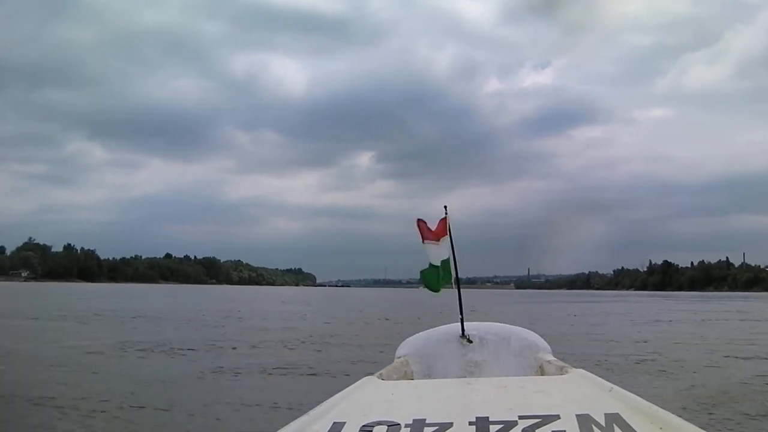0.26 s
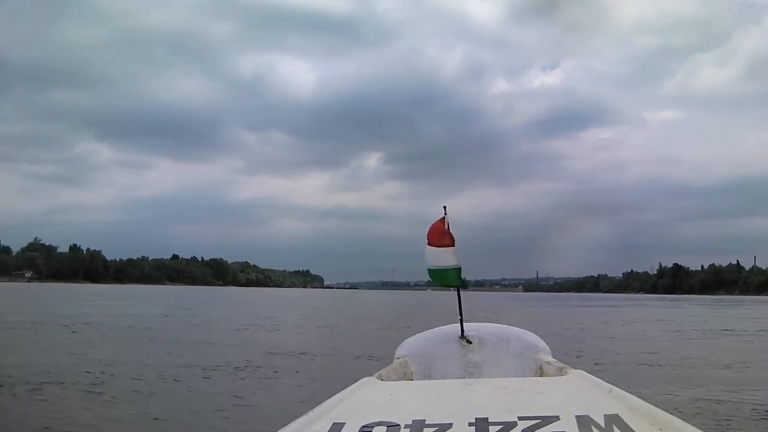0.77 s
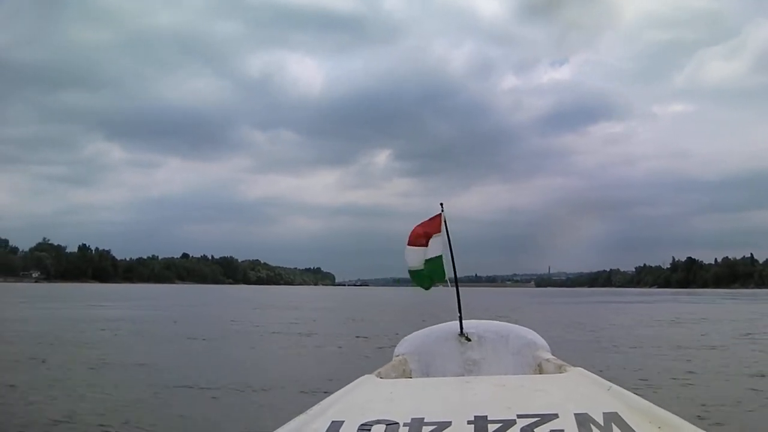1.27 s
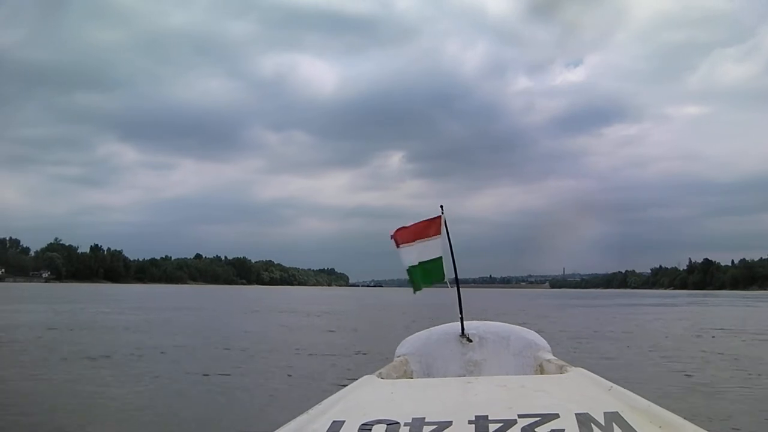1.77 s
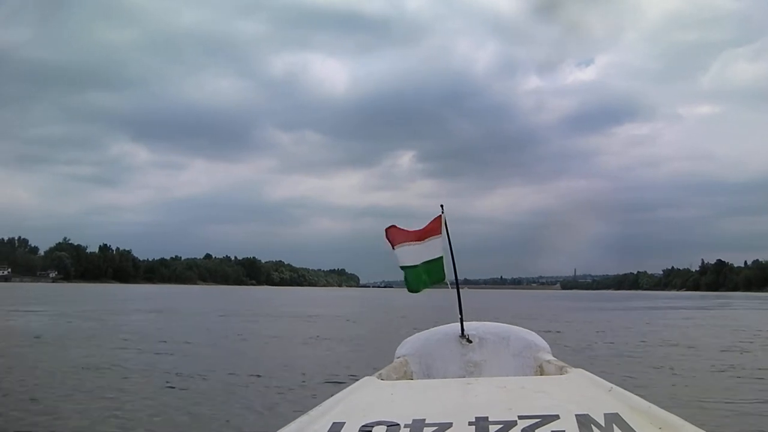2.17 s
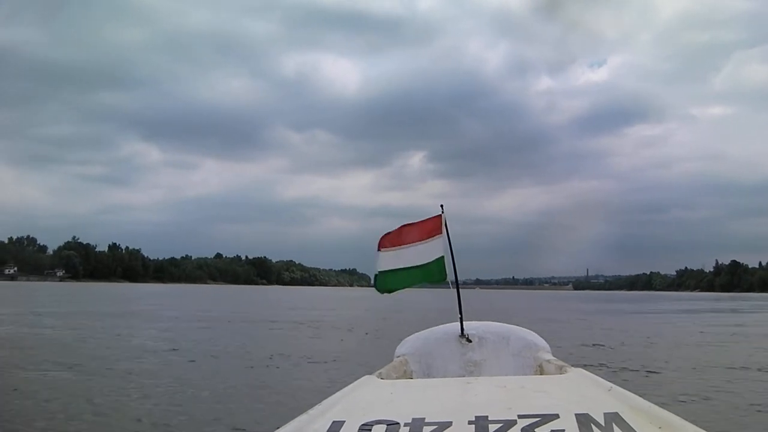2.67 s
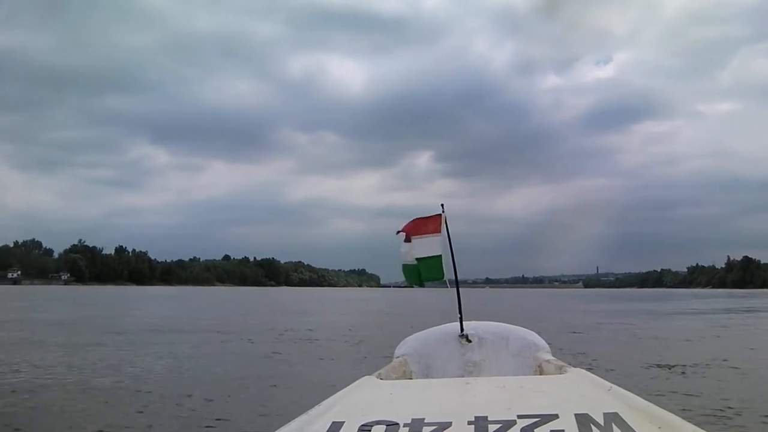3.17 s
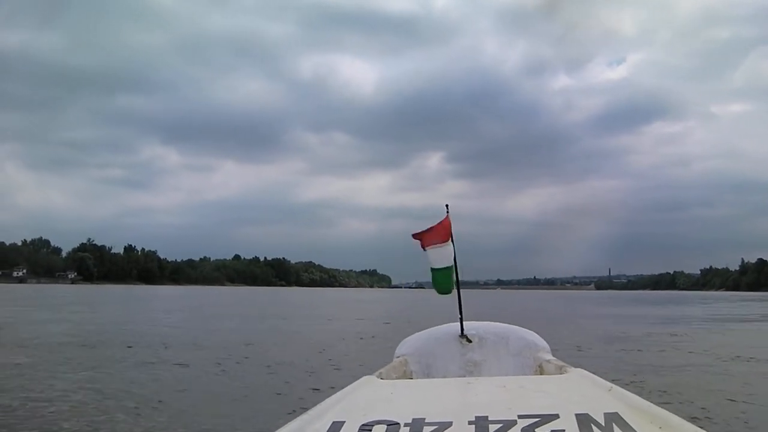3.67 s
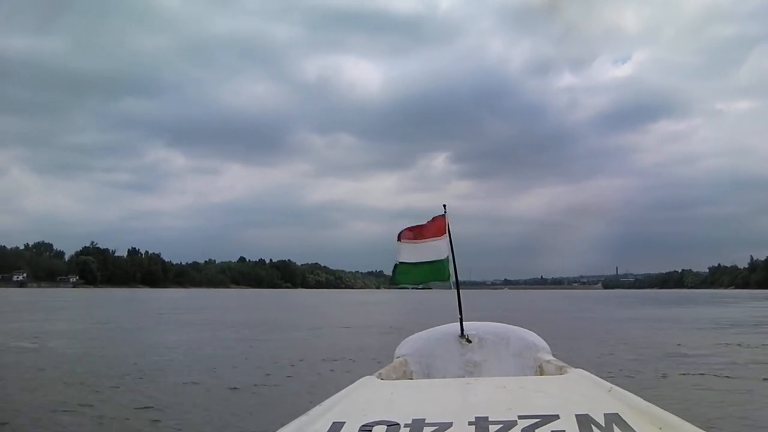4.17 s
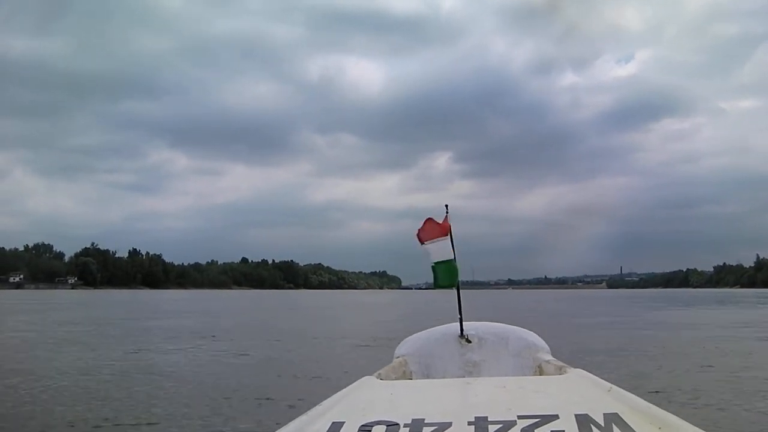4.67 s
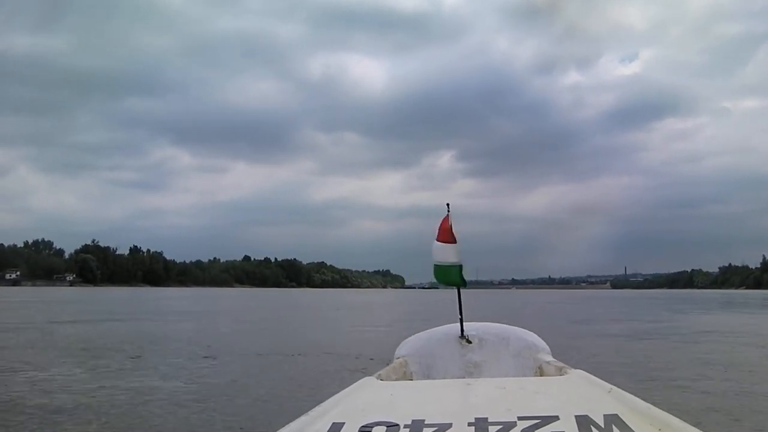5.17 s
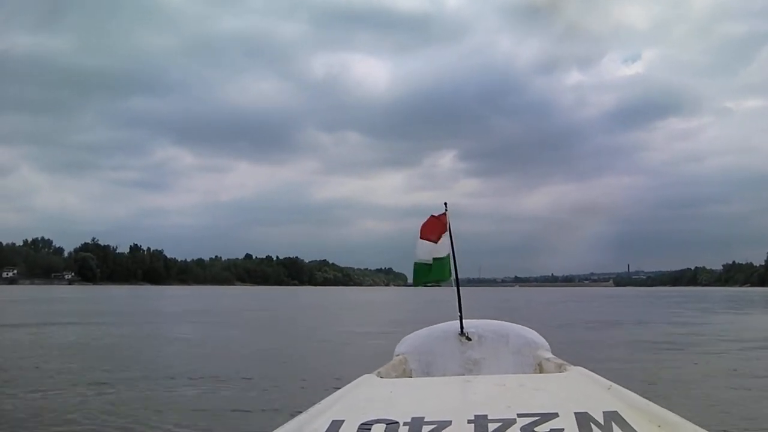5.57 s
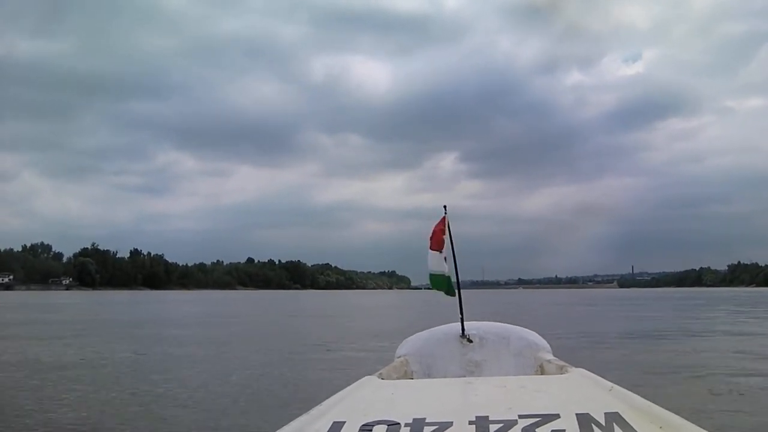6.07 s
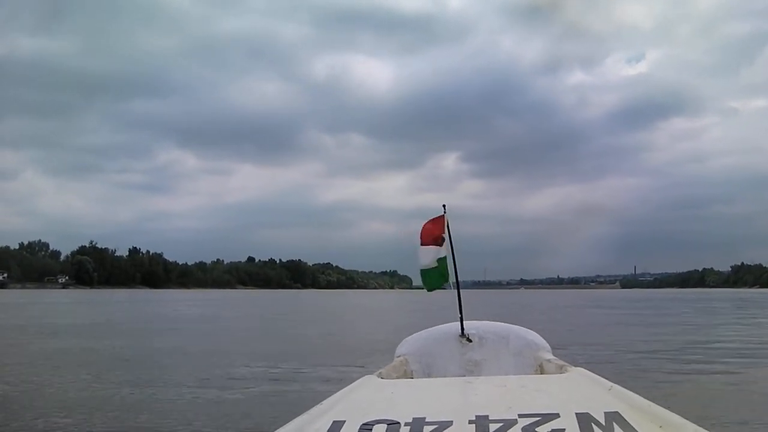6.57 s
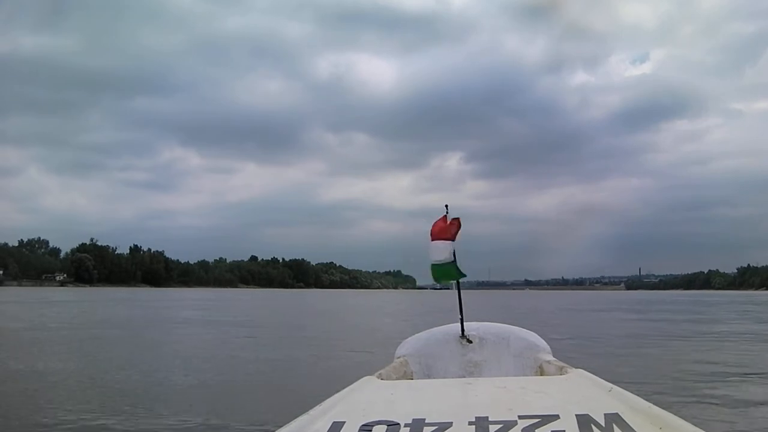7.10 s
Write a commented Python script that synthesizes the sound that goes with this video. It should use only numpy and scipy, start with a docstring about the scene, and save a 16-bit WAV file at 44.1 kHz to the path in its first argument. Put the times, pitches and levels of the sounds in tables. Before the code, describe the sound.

Strong headwind thuds, flutters and crackles over the microphone while a small outboard motor drones steadily, calming midway before the gusts return.

```python
"""Outboard motor in a headwind

A small two-stroke outboard at a steady firing rate: sine orders over an exhaust roar of coloured noise.
Headwind buffets the microphone ports: noise rumble and flutter, slow thumps, ringing thuds when an eddy
breaks, and clicking snaps when the capsule is overdriven. The wake hisses faintly as high noise.
The recorder lowers its gain after loud moments and rounds the highest peaks."""
import sys
import numpy as np
from scipy import signal
from scipy.fft import rfft, irfft, next_fast_len
from scipy.io import wavfile
from scipy.ndimage import uniform_filter1d

SR = 44100
rng = np.random.default_rng(int(sys.argv[2]) if len(sys.argv) > 2 else 0)


def wav_out(sig):
    """Save sig, one row per channel (or a flat mono array), as 16-bit PCM at SR to the path in sys.argv[1]."""
    wavfile.write(sys.argv[1], SR, np.round(np.clip(np.atleast_2d(sig).T, -1, 1) * 32767).astype(np.int16))


N = 323694

# motor loudness: time_s, level_db
MOTOR_LEVEL = [(0, -26), (1, -27.5), (2, -32), (3, -32.5), (4, -35), (5, -33.5), (6, -31.5), (7.34, -30.5)]
# orders of the firing rate: multiple, relative_level_db
FIRING_ORDERS = [(1, -6.5), (2, -14), (3, -18), (4, -18), (5, -16), (6, -11), (7, -12), (9, -14), (10, 0),
                 (11, -11), (12, -26), (15, -28), (16, -34), (21, -35), (22, -27.5)]
# exhaust roar spectrum: frequency_hz, relative_gain_db
ROAR_SPECTRUM = [(40, -40), (90, -8), (220, -14.5), (400, -7.5), (510, -6), (580, 1), (650, -3), (740, -5),
                 (820, -14), (1000, -24), (1450, -25.5), (1750, -41), (2050, -44.5), (2300, -54),
                 (3500, -75)]
FIRING_HZ = 69.42


def motor(roar_db, gate, waver_db, slip_rad):
    """Firing-rate orders, each slipping in phase, over an exhaust roar that swells once per firing."""
    level_db, = in_time(MOTOR_LEVEL)
    firing_hz = FIRING_HZ * (1 + .002 * drift(1.5) + .002 * drift(8))
    turn_rad = 2 * np.pi * np.cumsum(firing_hz) / SR
    starts_rad = rng.uniform(0, 2 * np.pi, len(FIRING_ORDERS))
    tones = np.zeros(N)
    for (multiple, db), start_rad in zip(FIRING_ORDERS, starts_rad):
        order_db = db + waver_db * (1.1 * drift(1.9) + drift(11.0))
        phase_rad = multiple * turn_rad + start_rad + slip_rad * drift(12.0)
        tones += from_db(order_db) * np.sin(phase_rad)
    swell = (1 + gate * np.cos(turn_rad)) * from_db(1.6 * drift(29.0))
    roar = noise(ROAR_SPECTRUM, swell)
    return from_db(level_db) * (np.sqrt(2) * tones + from_db(roar_db) * roar)


# headwind under the buffets: time_s, rumble_level_db
WIND_LEVEL = [(0.0, -15.5), (0.33, -35.5), (0.63, -18), (1.02, -24.5), (1.33, -19.5), (1.68, -25.5),
              (2.0, -18), (2.33, -29), (3.0, -26), (3.45, -29.5), (3.7, -28.5), (3.9, -37.5), (4.99, -37),
              (5.52, -41.5), (6.81, -23.5), (6.91, -28), (7.24, -23), (7.34, -28)]
# buffets: start_s, length_s, swell_db, flutter_re_swell_db
WIND_BUFFETS = [(0.004, 0.0023, 2, -11), (0.069, 0.017, -18.5, -3), (0.095, 0.024, -20.5, -12.5),
                (0.171, 0.023, -16, -1), (0.28, 0.066, -20.5, 6.5), (0.455, 0.018, -10, 0),
                (0.491, 0.061, -15, -3), (0.58, 0.013, -23.5, 5), (0.751, 0.033, -21.5, -9.5),
                (0.815, 0.037, -13.5, 3), (0.963, 0.032, -19, 1), (1.071, 0.015, -6, -18.5),
                (1.187, 0.054, -18, 0), (1.23, 0.031, -13.5, -2.5), (1.306, 0.024, -19.5, -4),
                (1.366, 0.065, -12, 0), (1.466, 0.014, -20, -8), (1.519, 0.028, -9.5, 3),
                (1.655, 0.056, -24, -3), (1.78, 0.045, -16.5, -0.5), (1.837, 0.11, -18.5, -1.5),
                (1.957, 0.035, -21, 5), (2.042, 0.039, -12.5, 6.5), (2.103, 0.1, -23.5, 7.5),
                (2.207, 0.047, -19, 0), (2.359, 0.038, -24.5, -3), (2.437, 0.066, -26, -0.5),
                (2.548, 0.024, -19, -3), (2.636, 0.076, -16, -3), (2.753, 0.039, -18.5, 0.5),
                (2.977, 0.039, -21, 2.5), (3.057, 0.027, -26, 3.5), (3.16, 0.099, -26.5, 10.5),
                (3.298, 0.049, -38, 5.5), (3.361, 0.12, -32, 6), (3.472, 0.028, -28, 12),
                (3.602, 0.05, -23.5, 2), (3.707, 0.041, -25, 7), (3.918, 0.013, -25, -8),
                (4.001, 0.016, -26.5, 2), (4.21, 0.097, -32.5, -16), (4.612, 0.022, -20, -10),
                (4.675, 0.02, -27, -8), (4.712, 0.022, -29, -11), (4.779, 0.031, -20.5, -9),
                (4.866, 0.022, -27.5, -15), (4.918, 0.021, -29, -14), (5.006, 0.044, -29.5, -6),
                (5.128, 0.054, -22, -7), (5.819, 0.026, -27, -1.5), (5.96, 0.031, -21, -9),
                (6.075, 0.024, -25, -10), (6.22, 0.091, -22, 3), (6.351, 0.077, -28, -3.5),
                (6.42, 0.022, -16, 0), (6.542, 0.076, -26.5, 4), (6.644, 0.028, -17, -1.5),
                (6.691, 0.077, -23, 0), (6.786, 0.024, -16, 4.5), (6.853, 0.089, -17.5, 2),
                (6.962, 0.039, -21, 5), (7.08, 0.069, -22, -1), (7.157, 0.045, -14.5, -1),
                (7.258, 0.023, -18, -1)]
BUFFET_EDGE_S = 0.011   # rise and fall
FLUTTER_UNDER_DB = -1.5   # flutter re rumble, between buffets
THUMP_LOW_HZ, THUMP_HIGH_HZ = 88.25, 135.1
THUMP_DB, BUFFET_RUMBLE_DB = -7, -3.5   # both re swell_db


def headwind():
    """Rumble and flutter curves in dB, plus thumps: each buffet swings the diaphragm slowly."""
    wind_db, = in_time(WIND_LEVEL)
    rumble = from_db(wind_db)
    flutter = from_db(wind_db + FLUTTER_UNDER_DB)
    thumps = np.zeros(N)
    chances = rng.uniform(0, 1, (len(WIND_BUFFETS), 2))
    for (start_s, length_s, db, flutter_db), (pitch, phase) in zip(WIND_BUFFETS, chances):
        first_s = max(start_s - BUFFET_EDGE_S, 0)
        t = first_s + np.arange(round((length_s + 2 * BUFFET_EDGE_S) * SR)) / SR
        nearest_edge_s = np.minimum(t - start_s, start_s + length_s - t)
        shape = from_db(db) * np.clip(nearest_edge_s / BUFFET_EDGE_S + .5, 0, 1)
        hz = THUMP_LOW_HZ + pitch * (THUMP_HIGH_HZ - THUMP_LOW_HZ)
        add(rumble, first_s, from_db(BUFFET_RUMBLE_DB) * shape)
        add(flutter, first_s, from_db(flutter_db) * shape)
        add(thumps, first_s, np.sqrt(2) * shape * np.sin(2 * np.pi * (hz * t + phase)))
    return 20 * np.log10(rumble), 20 * np.log10(flutter), from_db(THUMP_DB) * thumps


# rumble spectrum: frequency_hz, relative_gain_db
RUMBLE_SPECTRUM = [(15, -30), (25, -18), (60, -4.5), (103, 1), (125, 0.5), (263, -17), (306, -37),
                   (356, -7), (400, -9), (520, -31.5), (880, -120)]
# flutter spectrum: frequency_hz, relative_gain_db
FLUTTER_SPECTRUM = [(130, -37), (220, -8.5), (289, -8.5), (402, 12), (678, 2), (943, -6), (1120, -19.5),
                    (1400, -18), (1780, -28), (3330, -53.5), (4330, -61), (7330, -120)]


def wind(rumble_db, flutter_db, lumpy_db, grains_per_s, grain_db):
    """Pressure lumps shared by rumble and crackling flutter: small eddies tap the port cavity."""
    eddies = drift(31.0)
    rumble = noise(RUMBLE_SPECTRUM, from_db(lumpy_db * eddies))
    hits = rng.random(N) < grains_per_s / SR
    taps = hits * from_db(grain_db * np.minimum(rng.exponential(1, N), 2.0))
    taps = uniform_filter1d(taps, size=40)   # each tap lasts about 1 ms
    lumps = from_db(lumpy_db * 1.48 * eddies) * (0.52 + rms_one(taps))
    flutter = noise(FLUTTER_SPECTRUM, lumps)
    return from_db(rumble_db) * rumble + from_db(flutter_db) * flutter


# strong eddies breaking on the ports: middle_s, ring_db, sink_db
STRONG_THUDS = [(0.081, -11.5, -11), (0.1041, -2.5, -4), (0.1847, -3, -18), (0.238, -9, -21.5),
                (0.2493, -8.5, -30), (0.2889, -10, -7), (0.3049, -3, -25), (0.3184, -23, -23.5),
                (0.3285, -10.5, -25.5), (0.352, -7.5, -9.5), (0.4624, 0, -13), (0.486, -9, -25.5),
                (0.4968, -2.5, -34), (0.5151, -5, -18), (0.5292, -10, -18.5), (0.5898, 1, -7),
                (0.6135, -5.5, -26), (0.645, -12.5, -24.5), (0.717, -12, -24), (0.7297, -16, -32),
                (0.7671, -7, -19), (0.7806, -4, -11), (0.793, -9.5, -34), (0.8258, -1.5, -6),
                (0.957, -11, -32), (0.9712, -6, -22), (0.9898, -19, -15), (1.032, -10, -27),
                (1.08, -0.5, -18), (1.103, -13, -23), (1.1166, -3.5, -8), (1.127, -3, -25),
                (1.172, -9, -28.5), (1.2017, -6.5, -7), (1.244, -9.5, -9), (1.266, -8, -22.5),
                (1.3552, -5, -19), (1.3672, -5.5, -22), (1.3983, -2, -12), (1.4193, -10, -24),
                (1.4768, -6.5, -9.5), (1.5242, -0.5, -15), (1.533, -4, -13.5), (1.5417, -12, -7),
                (1.7882, -14, -12.5), (1.806, -8, -11), (1.8642, -5.5, -24), (1.9058, -5, -29),
                (1.965, -7.5, -14), (1.972, -3.5, -13), (2.041, -5.5, -33), (2.0554, 0, -14),
                (2.0636, -1, -21), (2.0768, 4.5, -23), (2.1168, -6.5, -2.5), (2.1643, -11, -25),
                (2.2308, -4.5, -23), (2.3645, -18, -22), (2.3777, -9.5, -20), (2.473, -6.5, -16),
                (2.487, -9.5, -13), (2.5176, -10, -33), (2.6674, -6, -19), (2.7155, -7.5, -21),
                (2.7881, -13, -18), (2.824, -13, -23), (2.9396, -11, -30), (2.9848, -5, -16.5),
                (2.9984, -7, -26), (3.1375, -8.5, -16.5), (3.1628, -8, -21), (3.1878, -6, -9.5),
                (3.1934, -11.5, -25), (3.3112, -6.5, -20), (3.377, -6.5, -30), (3.4171, -6, -13),
                (3.488, -2.5, -34), (3.4965, -5.5, -32), (3.6101, -10, -14), (3.717, -11.5, -35),
                (3.7588, -11, -18), (4.0113, -10, -18), (4.9311, -12, -22), (5.035, -15, -23),
                (6.071, -22, -26), (6.2771, -8, -24), (6.431, -15, -13), (6.5676, -8.5, -30),
                (6.5868, -5, -15.5), (6.661, -6.5, -12), (6.7066, -12, -24), (6.743, -2, -15.5),
                (6.752, -11, -11), (6.7952, -9.5, -4), (6.824, -10.5, -9.5), (6.8814, -17, -17.5),
                (6.8953, -8, -25), (6.9891, -10.5, -33), (7.0692, -18, -26), (7.0836, -11.5, -20),
                (7.0942, -18, -24.5), (7.1011, -10, -21), (7.1248, -7, -40), (7.139, -7.5, -22),
                (7.1707, -16.5, -17), (7.2353, -6.5, -15), (7.253, -9, -28.5), (7.2688, -9.5, -11)]
SMALL_THUDS_PER_S, FULL_WIND_DB = 20, -19   # rate at full wind; flutter level that counts as full
SMALL_THUD_DB, SMALL_SINK_DB = 4, -10   # ring re wind; sink re ring


def eddies_breaking(flutter_db):
    """Time, ring dB and sink dB of all thuds: strong ones, then random small ones, denser in strong wind."""
    odds = SMALL_THUDS_PER_S / SR * np.minimum(from_db(flutter_db - FULL_WIND_DB), 1) ** 2
    small = np.flatnonzero(rng.random(N) < odds)
    small = small[small > 700]   # room for the burst's first half
    small_db = np.minimum(flutter_db[small], FULL_WIND_DB) + SMALL_THUD_DB
    return np.c_[np.transpose(STRONG_THUDS), [small / SR, small_db, small_db + SMALL_SINK_DB]]


THUD_LOW_HZ, THUD_HIGH_HZ = 440, 620   # cavity ring
THUD_WIDTH_S, THUD_WIDER_S = 0.0018, 0.00041   # about the least width at half height; scale of the extra
SINK_AFTER_S, SINK_HZ, SINK_WIDTH_S = 0.0026, 127, 0.0068


def thuds(times_s, db, sink_db, under_db, spray_db, apart_db):
    """Each eddy briefly rings the port cavity, unevenly left and right, with a puff of brighter
    turbulence; then the diaphragm sinks once and swings back."""
    start, ratio, lean, pitch, long = rng.uniform(0, 1, (len(times_s), 5)).T
    hz = THUD_LOW_HZ + pitch * (THUD_HIGH_HZ - THUD_LOW_HZ)
    width_s = THUD_WIDTH_S - THUD_WIDER_S * np.log(long + 0.054)

    def swing(k, t):
        turn_rad = 2 * np.pi * (hz[k] * t + start[k])
        undertone = np.sin(turn_rad * (0.2 + 0.72 * ratio[k]))
        return from_db(db[k]) * (np.sin(turn_rad) + from_db(under_db) * undertone)

    def sag(k, t):
        return -from_db(sink_db[k]) * np.cos(2 * np.pi * SINK_HZ * t)

    cavity = bursts(times_s, width_s, swing)
    side = bursts(times_s, width_s, lambda k, t: (2 * lean[k] - 1) * swing(k, t - .0004))
    puffs = bursts(times_s, width_s * 1.4, lambda k, t: from_db(db[k] + spray_db))
    puff_spectrum = [(500, -30.5), (900, 15.5), (1800, -10.5), (3500, -35.0), (6000, -66.5)]   # Hz, dB
    spray = puffs * noise(puff_spectrum, 1)
    sink = bursts(times_s + SINK_AFTER_S, times_s * 0 + SINK_WIDTH_S, sag)
    return cavity + sink + from_db(apart_db) * side * [[1], [-1]] + spray


# strong capsule snaps, before the mix gains and tip filter: time_s, body_db, treble_db
STRONG_SNAPS = [(0.0783, -32, -70.5), (0.184, -38.5, -68.5), (0.2894, -33, -74), (0.305, -37, -76),
                (0.463, -26, -51.5), (0.484, -20.5, -49), (0.5124, -33, -67), (0.589, -16, -50),
                (0.7595, -35, -74), (0.8254, -36.5, -84), (0.969, -20.5, -46), (0.974, -25.5, -66),
                (1.0143, -34, -61), (1.032, -35, -63), (1.0768, -16.5, -80), (1.0788, -12.5, -46),
                (1.1012, -39, -73), (1.117, -28, -70), (1.1244, -25.5, -68), (1.128, -32, -71),
                (1.132, -38.5, -75), (1.198, -36, -78), (1.2249, -32, -83.5), (1.2316, -43, -86),
                (1.2466, -38.5, -79.5), (1.3449, -39, -77), (1.3949, -35.5, -68), (1.398, -32, -77),
                (1.415, -41.5, -55), (1.521, -28, -57), (1.524, -11, -46), (1.5283, -21, -60),
                (1.5319, -34, -66), (1.5398, -16.5, -43.5), (1.804, -31.5, -76), (1.853, -34, -74),
                (1.8634, -36, -74), (1.8977, -44, -84), (1.9645, -35, -65), (1.9694, -21, -49),
                (1.9744, -37, -67), (1.9805, -33, -70), (2.0474, -24, -60), (2.054, -15, -45),
                (2.0612, -32, -55), (2.0763, -12, -32), (2.084, -45, -55), (2.09, -45, -51),
                (2.115, -40.5, -56.5), (2.118, -26, -52), (2.1488, -37, -54.5), (2.1994, -31, -76),
                (2.216, -25, -90), (2.227, -29.5, -86), (2.2441, -42, -75), (2.366, -38, -73),
                (2.3748, -37.5, -72), (2.4724, -48, -79), (2.4842, -39, -78), (2.566, -45.5, -60),
                (2.6646, -32, -74), (2.6835, -24.5, -72), (2.688, -36, -65), (2.7875, -33.5, -73),
                (2.9823, -33, -83), (2.9923, -29.5, -78), (2.999, -37, -81), (3.1658, -25, -85),
                (3.1732, -31, -83), (3.185, -40, -87), (3.19, -34, -85), (3.2589, -28.5, -79),
                (3.3089, -47.5, -80), (3.4818, -26, -56), (3.4841, -19, -45.5), (3.4944, -27, -51),
                (3.499, -32, -60), (3.6102, -30.5, -71), (3.6277, -31, -76), (3.6662, -35, -85),
                (3.6746, -33, -82), (4.0106, -30.5, -75), (6.2747, -37, -81), (6.43, -35, -83),
                (6.5649, -30, -80), (6.736, -29.5, -70), (6.7503, -41, -76), (6.7962, -36, -80),
                (6.893, -33, -76), (6.918, -34, -76), (6.9761, -33.5, -77), (7.122, -37.5, -80),
                (7.138, -34, -80), (7.1632, -32, -80), (7.177, -34, -77), (7.187, -36, -77),
                (7.276, -33, -72)]
# housing knock: frequency_hz, gain_db, t60_s
HOUSING_MODES = [(1310, 10.5, 0.014), (2240, -11.5, 0.022)]
TICK_DB, TICK_SPREAD_DB, TICK_TREBLE_DB = -42, 2.5, -41.5   # re thud; scatter; tip re body


def snaps(thud_s, thud_db, body_hz, body_s, tip_s, apart):
    """A kink in the diaphragm's motion: dull click, housing knock and a noisy tip that differs by port.
    Every thud adds a faint one."""
    tick_db = thud_db + TICK_DB + TICK_SPREAD_DB * rng.standard_normal(len(thud_s))
    ticks = [thud_s, tick_db, tick_db + TICK_TREBLE_DB]
    times_s, db, treble_db = np.c_[np.transpose(STRONG_SNAPS), ticks]
    spread = rng.uniform(-1.8, 1, (len(times_s), 2))
    grit = rng.standard_normal((2, N))

    def click(k, t):
        hz = body_hz * (1 + 0.028 * spread[k, 0])
        return from_db(db[k]) * np.cos(2 * np.pi * hz * t + np.pi * spread[k, 1])

    body = bursts(times_s, times_s * 0 + body_s, click)
    tip_level = bursts(times_s, times_s * 0 + tip_s, lambda k, t: from_db(treble_db[k]))
    tip = tip_level * (grit[0] + apart * grit[1] * [[1], [-1]])
    tip = signal.sosfilt(signal.butter(2, [1500, 7000], "band", fs=SR, output="sos"), tip)
    knock = sum(from_db(gain_db) * ring(body, hz, t60_s) for hz, gain_db, t60_s in HOUSING_MODES)
    return from_db(-4.0) * body + knock + from_db(8.0) * tip


# wake spray loudness: time_s, level_db
WAKE_LEVEL = [(0, -69), (1.5, -66), (2.5, -70.5), (3.7, -69), (4.5, -66.5), (5.4, -66), (6.2, -69),
              (7.34, -73)]
# wake spectrum: frequency_hz, relative_gain_db
WAKE_SPECTRUM = [(1500, -27.5), (2400, -2), (3600, -2.5), (4700, -9.5), (5900, -8), (7500, -15),
                 (9000, -13.5), (16000, -16)]


def wake():
    """Spray of the wake: faint, fairly steady high hiss."""
    level_db = in_time(WAKE_LEVEL)[0] + 1.1 * drift(6)
    return from_db(level_db) * noise(WAKE_SPECTRUM, 1)


def from_db(db):
    """Gain of a level in dB."""
    return 10 ** (np.asarray(db) / 20)


def rms_one(x):
    """Scaled to rms 1."""
    return x / np.sqrt(np.mean(x ** 2) + 1e-20)


def in_time(rows):
    """Each column after the time as a curve over all samples."""
    times_s, *columns = np.transpose(rows)
    return [np.interp(np.arange(N) / SR, times_s, column) for column in columns]


def at_hz(points, hz):
    """A spectrum read on a log-frequency axis."""
    points_hz, values = np.array(points).T
    return np.interp(np.log(hz), np.log(points_hz), values)


def drift(rate_hz):
    """Slow chance: noise at every 40th sample through a double one-pole low-pass; spread about 1."""
    r = np.exp(-80 * np.pi * rate_hz / SR)
    white = rng.standard_normal(N // 40 + 2002)
    slow = signal.lfilter([1], [1, -2 * r, r * r], white)[2000:]   # drop the run-in
    return np.interp(np.arange(N) / 40, np.arange(len(slow)), rms_one(slow))


# left-right likeness of noise at the ports: frequency_hz, correlation_0_to_1
PORT_LIKENESS = [(25, .995), (70, 0.98), (250, 0.97), (500, 0.99), (1000, 0.98), (2000, 0.96), (4000, .72),
                 (9000, 0.18)]


def noise(spectrum, lumps):
    """Stereo noise, pulsed by lumps, then coloured; the ports hear it less alike in the treble; rms 1."""
    size = next_fast_len(N)
    hz = np.maximum(np.arange(size // 2 + 1) * SR / size, 1)
    pulsed = lumps * rng.standard_normal((2, N))
    mid, side = rfft(pulsed, size) * from_db(at_hz(spectrum, hz))
    alike = np.clip(at_hz(PORT_LIKENESS, hz), 0, 1)
    both = np.sqrt(1 + alike) * mid + np.sqrt(1 - alike) * side * [[1], [-1]]
    return rms_one(irfft(both, size)[:, :N])


def add(out, start_s, sound):
    """Mix a short sound in at start_s."""
    i = round(start_s * SR)
    out[..., i:i + sound.shape[-1]] += sound[..., :N - i]


def bursts(times_s, widths_s, shape):
    """One bell per time, width at half height; shape(k, t) is what burst k carries around its middle."""
    out, t = np.zeros(N), np.arange(-660, 660) / SR
    for k, (middle_s, width_s) in enumerate(zip(times_s, widths_s)):
        bell = np.exp(-np.log(16) * (t / width_s) ** 2)
        add(out, middle_s + t[0], bell * shape(k, t))
    return out


def ring(x, hz, t60_s):
    """One decaying mode, about unity gain at its peak."""
    r = 10 ** (-3 / (t60_s * SR))
    feedback = [1, -2 * r * np.cos(2 * np.pi * hz / SR), r * r]
    return signal.lfilter([(1 - r * r) / 2, 0, (r * r - 1) / 2], feedback, x + 1e-18)


def scene():
    """Motor, wind on the ports and the faint wake."""
    rumble_db, flutter_db, thumps = headwind()
    times_s, db, sink_db = eddies_breaking(flutter_db)
    # flutter is cut 5 dB to stay under the thuds
    air = thumps + wind(rumble_db, flutter_db - 5, lumpy_db=3.0, grains_per_s=250.0, grain_db=2.0)
    air = air + thuds(times_s, db, sink_db, under_db=-9.5, spray_db=-25.0, apart_db=-10.5)
    air = air + snaps(times_s, db, body_hz=1410, body_s=0.00036, tip_s=0.0017, apart=.4)
    hiss = wake()
    return motor(roar_db=4.0, gate=0.05, waver_db=2.0, slip_rad=0.3) + air + hiss


def record(dry):
    """Gain sinks a little after loud moments and recovers; peaks are rounded; the top is cut."""
    knee_db, cut_db_per_db, over_fall_db_per_s = -10, .2, 70
    smooth_s, cutoff_hz = .006, 15800
    # coupling capacitor
    lean = signal.sosfilt(signal.butter(2, 40, "high", fs=SR, output="sos"), dry)
    peak_db = 20 * np.log10(np.abs(lean).max(axis=0) + 1e-9)
    over_db = np.maximum(peak_db - knee_db, 0)
    fall_db = over_fall_db_per_s * np.arange(N) / SR
    held_db = np.maximum.accumulate(over_db + fall_db) - fall_db
    r = np.exp(-1 / (smooth_s * SR))
    levelled = lean * from_db(-cut_db_per_db * signal.lfilter([1 - r], [1, -r], held_db))
    rounded = levelled / (1 + levelled ** 4) ** .25   # preamp near full scale
    cut = signal.sosfilt(signal.ellip(11, .1, 60, cutoff_hz, fs=SR, output="sos"), rounded)
    cut = cut * from_db([[-.2], [.2]])   # right capsule slightly more sensitive
    return np.clip(cut, -1, 1)


dry = scene()
out = record(dry)
wav_out(out)
```